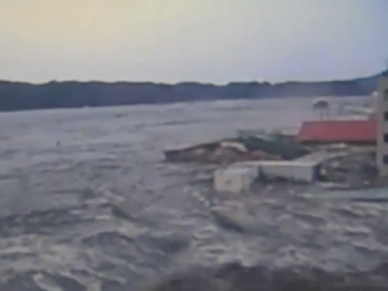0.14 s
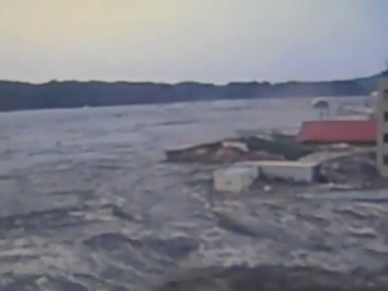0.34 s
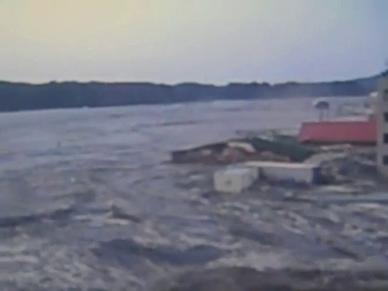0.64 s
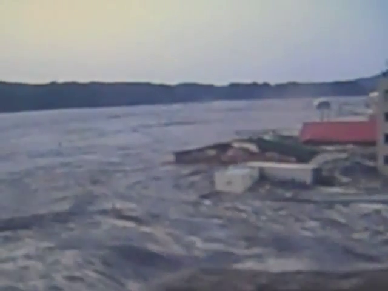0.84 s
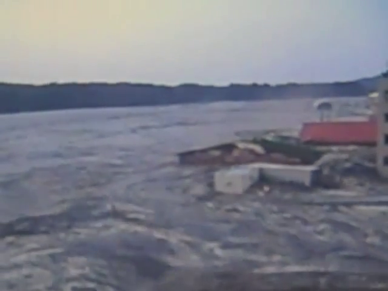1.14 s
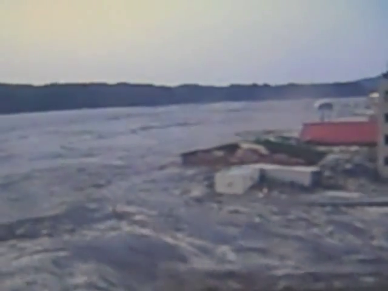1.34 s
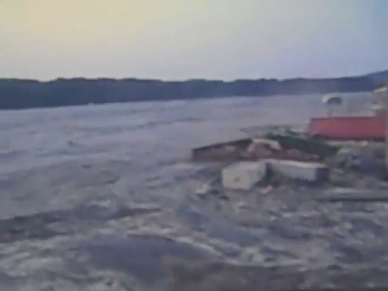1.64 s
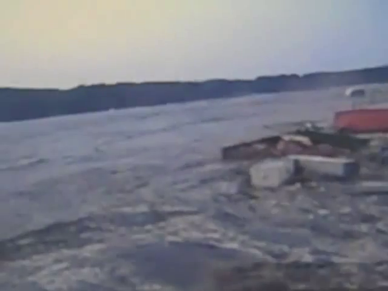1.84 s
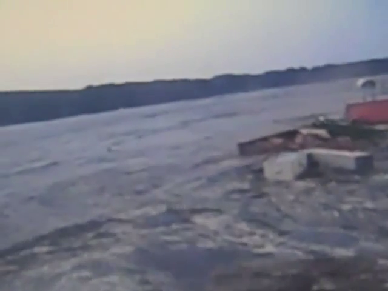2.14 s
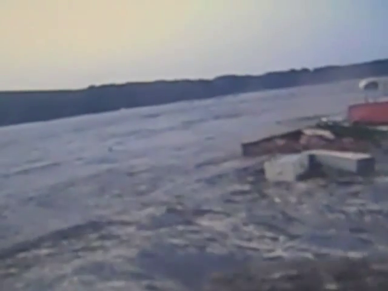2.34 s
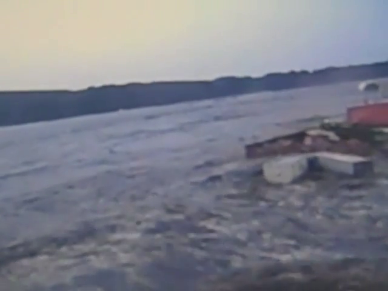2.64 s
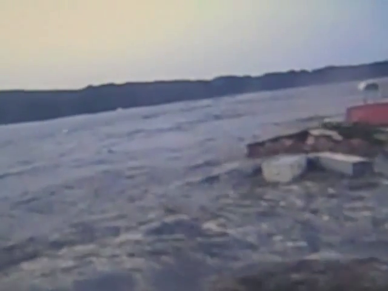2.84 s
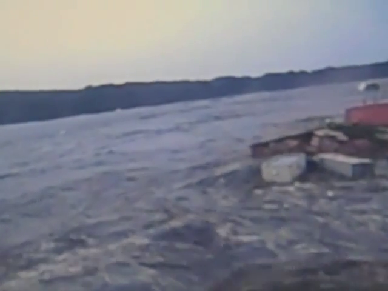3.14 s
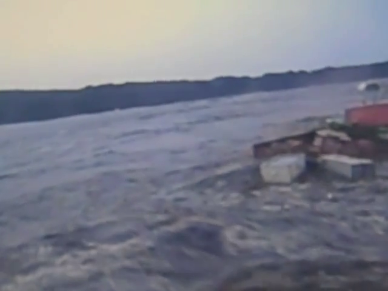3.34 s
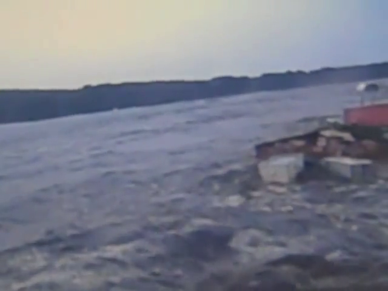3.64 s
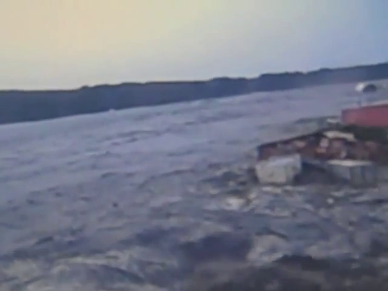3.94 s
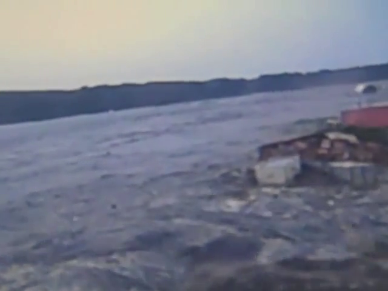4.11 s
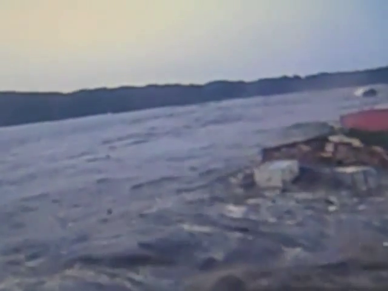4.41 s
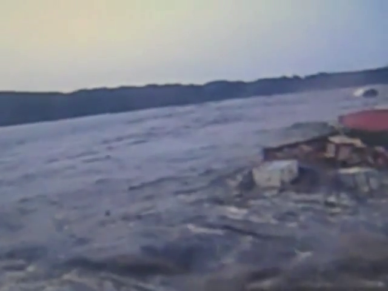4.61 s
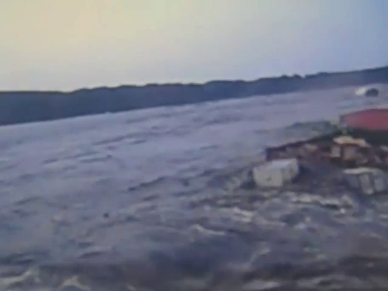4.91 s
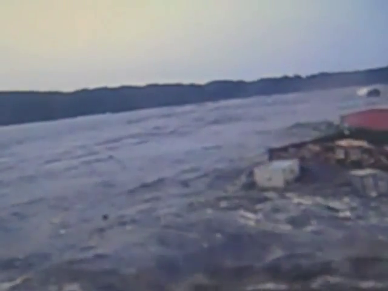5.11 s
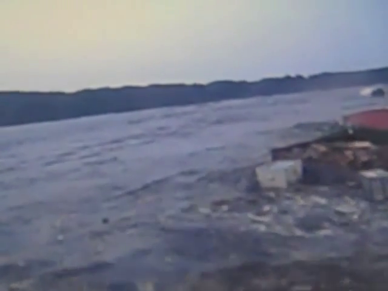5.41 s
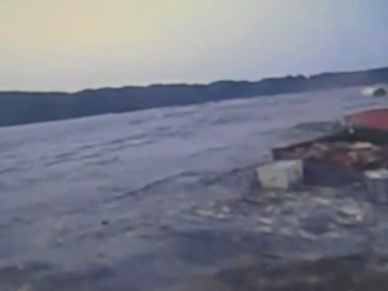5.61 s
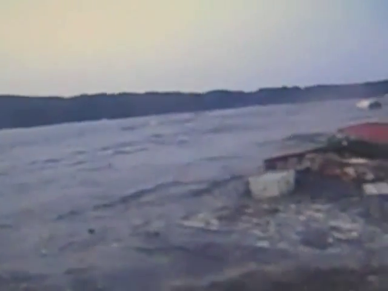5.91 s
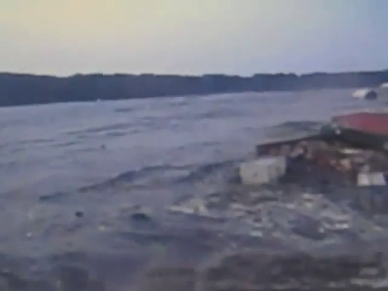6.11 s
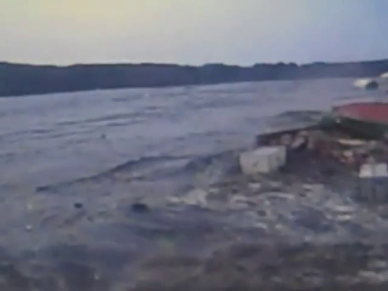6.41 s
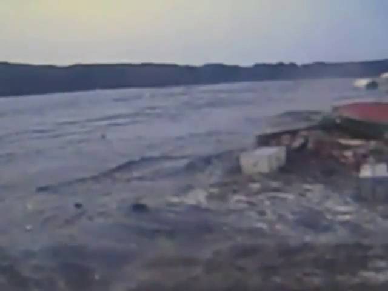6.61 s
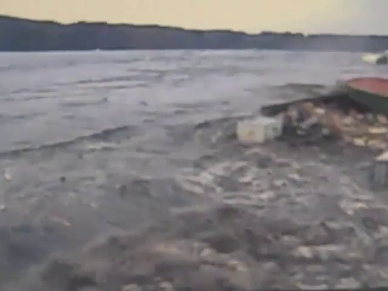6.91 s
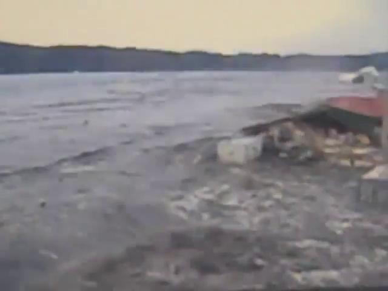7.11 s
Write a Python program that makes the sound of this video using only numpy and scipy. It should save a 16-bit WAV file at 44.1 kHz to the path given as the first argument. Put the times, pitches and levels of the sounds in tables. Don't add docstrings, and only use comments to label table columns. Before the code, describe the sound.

Floodwater rushes without a break past wrecked buildings and debris. The noise churns and flickers unevenly, dips slightly around two and a half seconds, then surges louder from about four, strongest near five and a half. Short bubbly splashes poke through. It sounds like a small loudspeaker playing in a room, coloured and thin, with little bass and dull top, heard by two close microphones.

```python
import sys
import numpy as np
from scipy import signal
from scipy.fft import rfft, irfft
from scipy.io import wavfile
from scipy.ndimage import uniform_filter1d

SR = 44100
rng = np.random.default_rng(int(sys.argv[2]) if len(sys.argv) > 2 else 0)


def store_pcm(level_fs):
    pcm = np.round(np.clip(level_fs, -1, 1) * 32767).astype(np.int16)
    wavfile.write(sys.argv[1], SR, np.atleast_2d(pcm).T)


def invert_db(level):
    return 10 ** (np.asarray(level, dtype=float) / 20)


N = 320166
BIN_HZ = np.fft.rfftfreq(512, 1 / SR)

LAYER_HZ = [740, 1580, 3060, 5200]


def evened(x):
    return x / np.sqrt(np.mean(x ** 2) + 1e-20)


def read(table, hz, axis=1):
    table = np.transpose(table)
    return np.interp(np.log(hz + 1), np.log(table[0] + 1), table[axis])


def noise(field_db):
    a, b = rng.standard_normal(field_db.shape[::-1] + (2,)).T
    return signal.istft((a + 1j * b) * invert_db(field_db), nperseg=512, noverlap=384)[1][:N]


def swell(sway_db=0.27, heave_half_s=0.025, heave_octaves=0.76):
    # (time [s], level [dB])
    surge = [(0.0, -1.5), (0.75, -.5), (1.2, -1.5), (2.0, -1.5), (2.4, -2.5), (2.8, -2), (3.3, -1),
             (3.95, -2.5), (4.2, 2), (4.45, 1.5), (4.7, 0.5), (5.1, 2.8), (5.6, 4), (5.95, 2), (6.3, 2.2),
             (6.75, 1), (7.05, 1.5), (7.26, -0.5)]
    # (time [s], level [dB])
    foam = [
        (0.0, 0.5),
        (0.6, 0.5),
        (1.7, 0),
        (1.95, -1),
        (4.0, 0.35),
        (5.0, 0),
        (6.3, -0.05),
        (7.26, 1.5),
    ]
    follows_surge = [0.1, 1.08, 1.14, 0.22]
    follows_foam = [0.046, .1, .1, 1.2]
    # (time [s], level [dB], centre [Hz])
    heaves = [(0.39, 2.5, 740), (0.66, 4.5, 740), (0.91, -4.5, 1580), (0.97, 1.5, 1990), (1.11, 3.5, 5200),
              (1.619, 0.5, 740), (1.73, -4, 800), (1.89, -6.5, 4520), (2.085, 5, 740), (2.44, -0.5, 1520),
              (2.601, 6.5, 740), (2.78, 4, 2230), (2.99, -3, 2210), (3.521, 2.5, 1900), (3.78, -7.5, 740),
              (3.775, -6.5, 5200), (4.34, -2.5, 1580), (4.42, 4, 1900), (4.515, 4, 1900), (4.576, 2, 5200),
              (4.619, -2.5, 740), (4.685, -3, 1900), (5.21, -2, 740), (5.21, -4.5, 5200), (5.44, -4, 5470),
              (5.609, 3, 5200), (5.82, -2.5, 740), (5.9, 5.5, 1900), (5.7, 2, 1050), (6.86, -3.5, 1690)]

    t = np.arange(N // 128 + 6) * 128 / SR
    layers_db = np.outer(follows_surge, np.interp(t, *np.transpose(surge)))
    layers_db += np.outer(follows_foam, np.interp(t, *np.transpose(foam)))
    sway = rng.standard_normal((len(t), len(LAYER_HZ))).T
    sway = uniform_filter1d(uniform_filter1d(sway, size=20, axis=1), size=20, axis=1)
    layers_db += sway_db * evened(sway)
    shares = [np.interp(BIN_HZ, LAYER_HZ, alone) for alone in np.eye(len(LAYER_HZ))]

    heave_s, heave_db, centre_hz = np.transpose(heaves)
    octaves = np.log2((BIN_HZ[:, None] + 1) / centre_hz)
    reach = np.exp(-(octaves / heave_octaves) ** 2)
    course = np.exp(-((t - heave_s[:, None]) / heave_half_s) ** 2)
    return np.transpose(shares) @ layers_db + (reach * heave_db) @ course


def water(patchy_db=1.0, flicker_db=1.07):
    swell_db = swell()
    bins, frames = swell_db.shape
    patches = rng.standard_normal((frames, bins)).T
    patches = evened(uniform_filter1d(uniform_filter1d(patches, size=8, axis=0), size=20, axis=1))
    flicker = evened(uniform_filter1d(rng.standard_normal(frames), size=6))
    surface = np.interp(BIN_HZ, LAYER_HZ[:2], [.6, 1])[:, None]
    return evened(noise(swell_db + surface * (patchy_db * patches + flicker_db * flicker)))


def splashes(rise_s=0.0056, gain_db=14):
    # (time [s], peak level [dB], centre [Hz], width [Hz], t60 [s])
    near = [(0.225, -12, 3100, 450, 0.21), (.963, -19.5, 1810, 300, 0.084), (1.738, -15, 2910, 45, 0.12),
            (2.755, -18.5, 1783, 500, .2), (3.7, -18.5, 1139, 600, .13), (4.118, -18, 5200, 405, 0.19),
            (4.385, -17.5, 1284, 1194, 0.23), (4.405, -8, 2610, 194, 0.11), (4.51, -28, 1815, 300, 0.18),
            (4.999, -16.5, 2890, 504, 0.1), (5.124, -17, 1815, 300, 0.11), (5.4, -16, 3380, 150, .12),
            (5.49, -19, 5270, 300, 0.22), (5.598, -14.5, 5244, 150, 0.14), (5.889, -21.5, 1900, 402, .13),
            (7.042, -9.5, 3123, 498, 0.091)]
    out = np.zeros(N + SR)
    t = np.arange(SR // 3) / SR
    for s, db, hz, width_hz, t60_s in near:
        pole = np.exp(-np.pi * width_hz / SR)
        a, b = rng.standard_normal((2, len(t)))
        envelope = signal.lfilter([1], [1, -pole], a + 1j * b)
        puff = (envelope * np.exp(2j * np.pi * hz * t)).real
        shape = (1 - np.exp(-t / rise_s)) * invert_db(db + gain_db - 60 * t / t60_s)
        out[round(s * SR):][:len(t)] += shape * evened(puff)
    return out[:N]


def colour(hz):
    # (frequency [Hz], left [dB], right [dB])
    box = [(90, -35, -36), (150, -31, -34.5), (220, -17.5, -15.5), (543, -12, -11), (616.6, -2.04, 0.0),
           (941, -9.5, -7.5), (1234, -26.5, -26), (1900, -6.5, -7.5), (2310, -29.5, -27), (2796, -6, -7),
           (4220, -21, -24), (5330, -6, -5), (7204, -15.5, -15), (9250, -36, -57.5)]
    # (frequency [Hz], width [Hz], left [dB], right [dB])
    standing = [(178.2, 6.2, 6.0, 6.5), (193, 20, -4.5, -4.0), (249.6, 12, -3.0, -10.0),
                (300, 11, -8.0, -9.0), (327.8, 13, 7.0, 5.0), (384, 17, -4.5, -9.5), (405, 43, 2.5, 5.0),
                (462, 12, -4.5, -6.0), (455, 14, 2.0, -11.0), (452, 12, -7.5, -2.0), (510, 8.7, -5.0, -4.0),
                (578.8, 11.7, -12.0, -13.0), (607.6, 29, 4.5, 4.0), (677.0, 19, -2.0, -7.5),
                (719, 31, -3.5, -5.0), (777.0, 14, 6.0, 5.0), (923.6, 36, 5.5, 5.0), (1072, 21, 10.0, 6.0),
                (1144, 13, -9.5, -11.0), (1225, 18, -2.0, -10.5), (1340, 17, 9.5, 9.0),
                (1353, 13, 0.0, -8.0), (1458, 26, 4.5, 6.5), (1563, 18, -2.0, -2.0), (1607, 11, 2.5, -10.0),
                (1766, 13, -3.5, -9.0), (1969, 22, 6.0, 7.5), (2210, 33, -6.0, -7.0),
                (659.0, 11, -2.5, -2.5), (656.7, 8.9, 7.5, 7.5)]
    # (frequency [Hz], width [Hz], left [dB], right [dB])
    reflected = [(2310, 60, 3, -9), (2390, 60, 0.5, 3), (2470, 45, 7, -11), (2660, 81, 5, 6),
                 (2997, 32, 8.5, -1.5), (3100, 31, 5.5, -10.5), (3350, 48, 4.5, 12.5), (3550, 27, 4.5, 9.5),
                 (3850, 36, 9.5, 1.5), (4080, 67, -6, -2), (4200, 37, 1.5, -13), (4625, 50, 3.5, 9.5),
                 (4830, 37, -9.5, -5.5), (4970, 60, -5, -0.5), (5423, 60, -10.5, -4),
                 (5617, 140, -2, -17.5), (5720, 60, 2.5, 1), (5870, 45, -2.5, 9), (6036, 60, -10, -12),
                 (6790, 230, -1, -6), (7010, 60, 12, -6), (7540, 55, 0.5, 9), (7850, 160, 6, 6),
                 (7670, 60, 5.5, -4.5), (8280, 170, 8, 11.5), (8670, 140, 5.5, 0), (8946, 51, 8, -9.5),
                 (9130, 40, 11, 2.5)]
    db = np.array([read(box, hz, axis=1), read(box, hz, axis=2)])
    for centre_hz, width_hz, *ears_db in [*standing, *reflected]:
        db += np.array(ears_db)[:, None] / (1 + (2 * (hz - centre_hz) / width_hz) ** 2)
    both_sides_db = np.concatenate([db, db[:, -2:0:-1]], axis=1)
    log_gain = np.log(invert_db(both_sides_db))
    return np.exp(np.conj(signal.hilbert(log_gain)))[:, :len(hz)]


def echoes(size, start_s=.004, spacing_m=.035, lag_s=3.2e-5):
    # (frequency [Hz], level [dB], t60 [s])
    late = [(100, -15.5, 0.36), (1000, -14.5, 0.34), (1230, -4, 0.33), (1900, -8, 0.37), (2320, -5, 0.23),
            (2860, -2.5, 0.25), (4300, 4, 0.26), (5300, -3, .3), (6650, 4, 0.51), (8700, 6, 0.28)]
    taps = rng.standard_normal((2, size)) * (np.arange(size) > start_s * SR)
    hz, t, z = signal.stft(taps, SR, nperseg=256)
    t60_s = read(late, hz, axis=2)[:, None]
    tail = signal.istft(z * invert_db(-60 * t / t60_s) / np.sqrt(t60_s), SR, nperseg=256)[1][:, :size]
    tail = rfft(tail * np.sqrt(6 * np.log(10) / SR))

    hz = np.fft.rfftfreq(size, 1 / SR)
    same = np.sinc(2 * hz * spacing_m / 343)
    tail[1] = same * tail[0] + np.sqrt(1 - same ** 2) * tail[1]
    direct = np.array([np.exp(-2j * np.pi * hz * lag_s), np.ones(len(hz))])
    gain = direct + invert_db(read(late, hz)) * tail
    wide = uniform_filter1d(uniform_filter1d(abs(gain) ** 2, size=60, axis=1), size=60, axis=1)
    return gain / np.sqrt(wide)


def blurred_rush(level_db=-36):
    # (frequency [Hz], density [dB per Hz])
    density = [(100, -20), (200, -17), (400, -15), (650, -6), (1230, -9), (1800, -4), (2300, -3),
               (3000, -1), (4200, -5), (6000, -3), (8000, -12), (9200, -27)]
    blurred_db = uniform_filter1d(swell(), size=60, axis=1)
    field_db = read(density, BIN_HZ)[:, None] + blurred_db
    return invert_db(level_db) * evened(np.array([noise(field_db), noise(field_db)]))


def scene(rush_db=-21):
    size = 32768
    path = irfft(colour(np.fft.rfftfreq(size, 1 / SR)) * echoes(size))
    source = water() + splashes()
    lead = SR // 2
    led_in = np.r_[source[-lead:], source]
    heard = signal.fftconvolve(led_in[None], path, axes=1)[:, lead:lead + N]
    return invert_db(rush_db) * evened(heard) + blurred_rush()


def thinned(x, size=1024):
    # (low edge [Hz], high edge [Hz], share of blocks kept [0-1])
    faint = [(0, 90, .13), (90, 135, .4), (135, 175, .75), (8950, 9100, .3), (9100, 9400, .15)]
    hz, _, z = signal.stft(x, SR, nperseg=2 * size, noverlap=size, window="cosine")
    for low_hz, high_hz, share in faint:
        band = (hz >= low_hz) & (hz < high_hz)
        power = uniform_filter1d((abs(z[:, band]) ** 2).sum(axis=1), size=2, axis=1)
        kept = power >= np.quantile(power, 1 - share, axis=1)[:, None]
        z[:, band] *= kept[:, None]
    return signal.istft(z, SR, nperseg=2 * size, noverlap=size, window="cosine")[1][:, :N]


def roll_off(x):
    return signal.sosfilt(signal.butter(12, 9540, fs=SR, output="sos"), x)


def record(dry, bass_cut_hz=62, edge_hz=9300):
    high_pass = signal.butter(2, bass_cut_hz, "high", fs=SR, output="sos")
    low_pass = signal.firwin(1023, edge_hz, window=("kaiser", 9), fs=SR)
    limited = signal.oaconvolve(signal.sosfilt(high_pass, dry), low_pass[None], "same")
    return roll_off(thinned(limited))


dry = scene()
out = record(dry)
store_pcm(out)
```